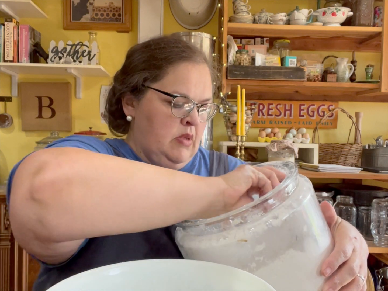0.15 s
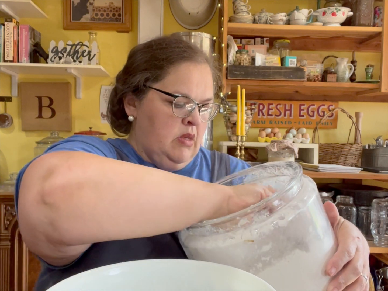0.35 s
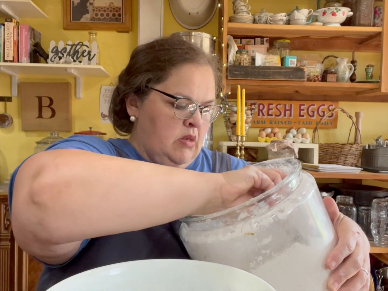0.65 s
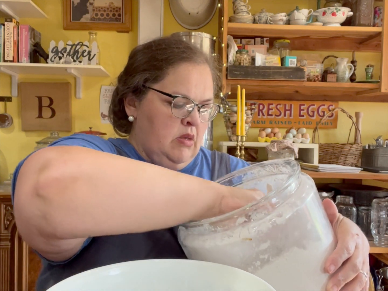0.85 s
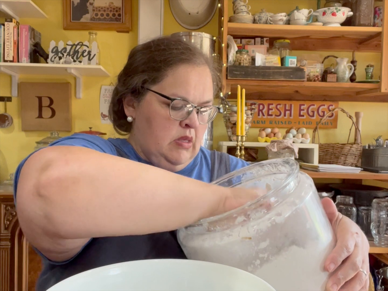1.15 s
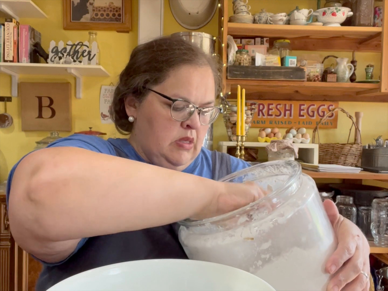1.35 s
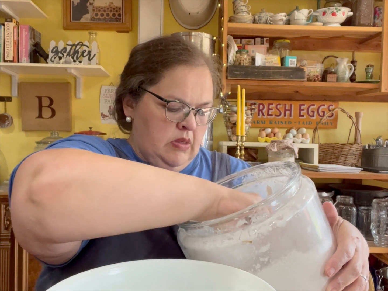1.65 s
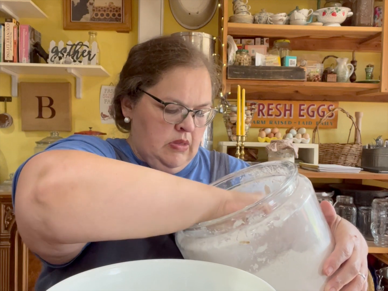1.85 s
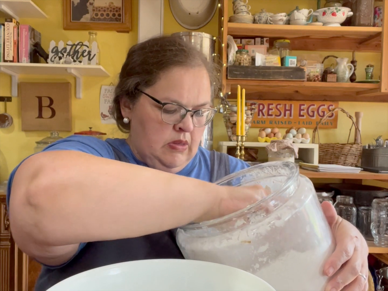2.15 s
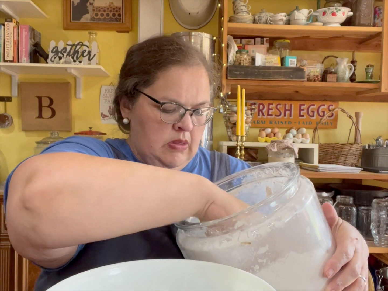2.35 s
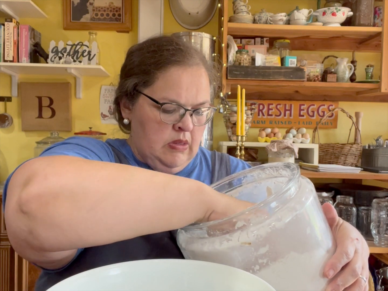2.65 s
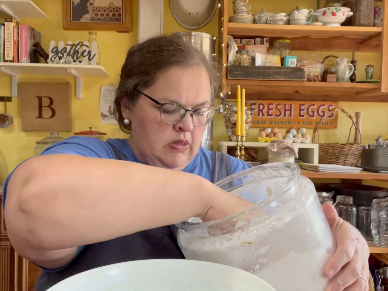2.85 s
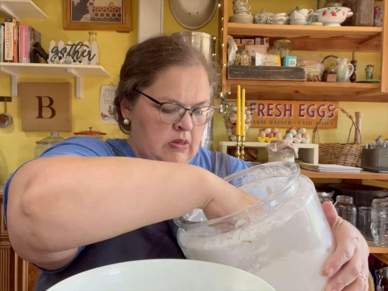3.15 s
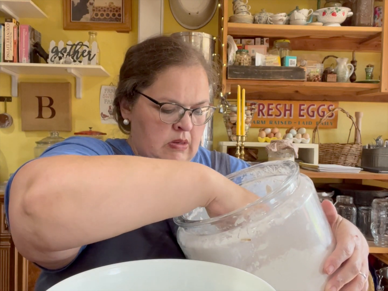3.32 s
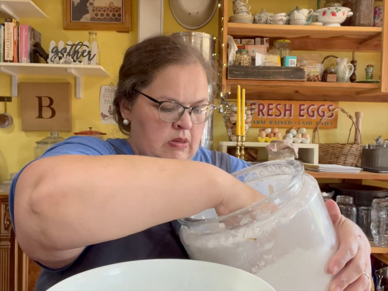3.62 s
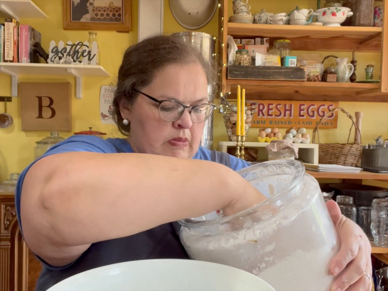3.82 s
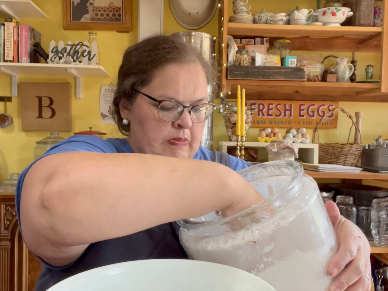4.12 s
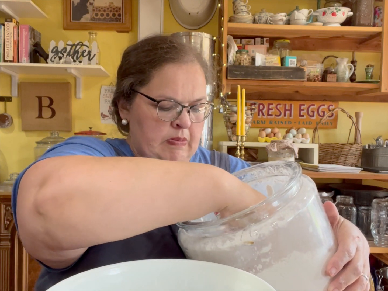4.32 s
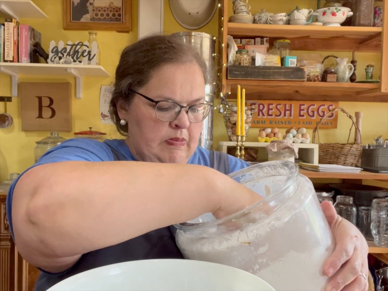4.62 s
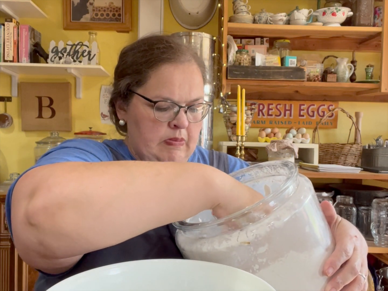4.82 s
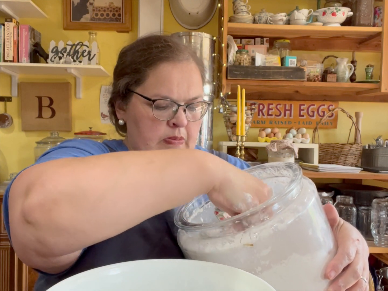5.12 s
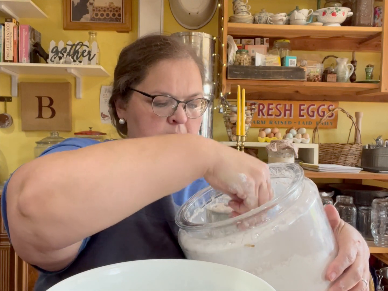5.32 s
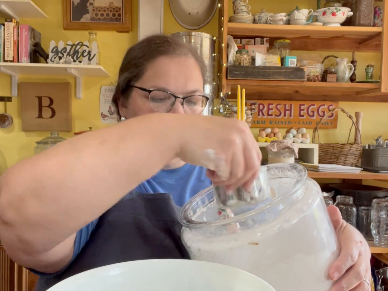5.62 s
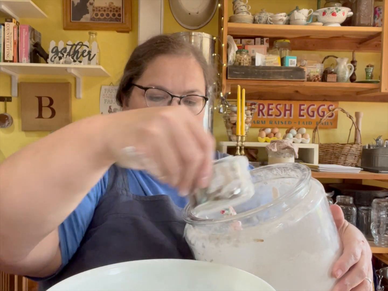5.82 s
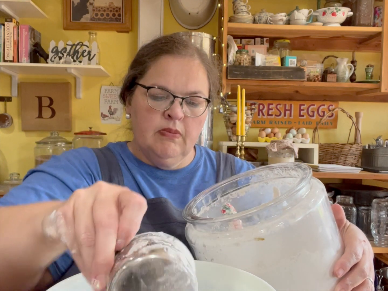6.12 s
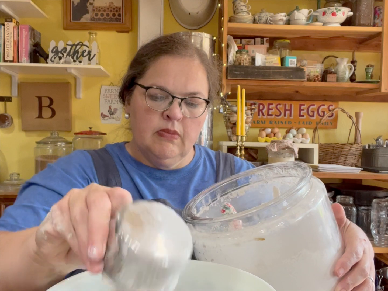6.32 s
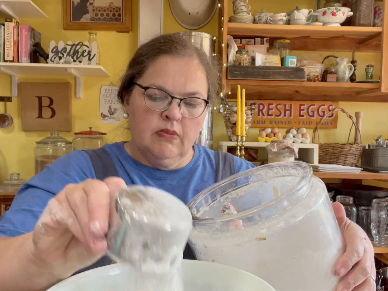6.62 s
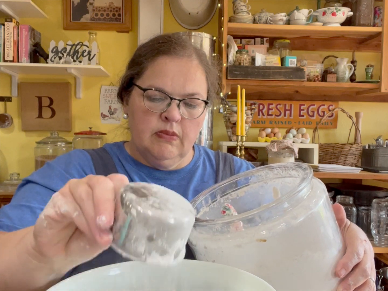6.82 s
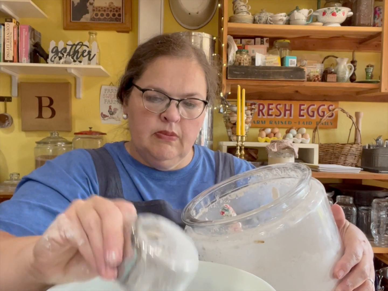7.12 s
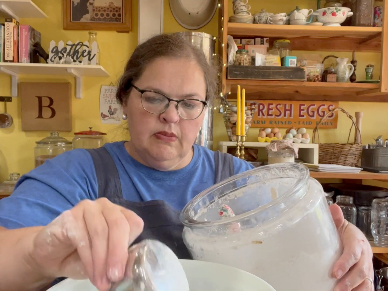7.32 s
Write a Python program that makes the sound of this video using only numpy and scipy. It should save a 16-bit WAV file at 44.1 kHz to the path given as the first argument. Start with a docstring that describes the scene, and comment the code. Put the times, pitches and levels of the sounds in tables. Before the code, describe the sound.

In a small quiet kitchen with a steady fridge hum, a close stereo microphone hears a small cup knocking in a big glass jar of flour to the right. Muted knocks crowd the first two seconds, the loudest a bright ringing clink near one second. Then come long near-silences, a dry crack, two dull bumps, soft drags, grainy slides of flour and a faint final thump.

```python
"""A quiet kitchen, with a two-port microphone close to a big glass jar of flour that stands to its right.
From the start a fridge hums (beating sines, coloured noise) and flour trickles (grainy high noise).
Soon a small cup knocks on the jar wall (clicks, air thumps, decaying modes of glass and cup), each blow
with a worktop echo and a noise tail of the room. Short slides of flour come between, lower noise rasps as
the cup drags, bright cracks come with some knocks and slides or alone; late on, flour lands with a thump."""
import sys
import numpy as np
from scipy import signal
from scipy.fft import rfft, irfft, next_fast_len
from scipy.io import wavfile

SR = 44100
rng = np.random.default_rng(int(sys.argv[2]) if len(sys.argv) > 2 else 0)


def materialize(psi):
    """Save the field psi as 16-bit PCM at rate SR to the path in sys.argv[1].

    A 1-D psi becomes a single channel; in a 2-D psi each row is a channel.
    """
    bounded = np.clip(np.atleast_2d(psi).T, -1, 1)
    quanta = np.round(bounded * 32767).astype(np.int16)
    wavfile.write(sys.argv[1], SR, quanta)


N = 329427

# Room tone behind the jar. Each row: frequency in Hz, relative density in dB per Hz.
ROOM_TONE_COLOUR = [(20, -44), (33, -17.5), (48, -10), (66, -0.5), (88, -5), (157, -3.5), (220, -6.5),
                    (330, -7.5), (480, -13.5), (800, -15.5), (2200, -26.5), (4500, -37.5), (8500, -45),
                    (11000, -58.5), (16000, -61)]
# Chosen stereo spread of the noise, wide in the treble. Each row: frequency in Hz, shared power from 0 to 1,
# radians by which the right leads, left minus right in dB.
STEREO_SPREAD = [(39.7, 1, 0.5, 2), (154, 1, 0.5, 0), (215, 0.7, 0, 1.5), (347, 1, 1.22, -1),
                 (461, 0.02, 1.5, 1.5), (764, 0.5, 2, -2), (950, 0.3, 2.5, 0), (1200, 0.8, 1.5, -0.5),
                 (2260, 0, 4.5, 2), (4900, 0.05, 3.5, -2), (6600, 0, 3, 1.5), (8720, 0.9, 4.5, 2),
                 (9100, .999, 3.14, 0), (12600, .999, 3.14, 0), (13900, 0.5, 2, -3), (15400, 0.5, 3, 2.5)]
# Spectrum of sifting flour. Each row: frequency in Hz, relative density in dB per Hz.
SIFT_COLOUR = [(2000, -29), (4000, -6.5), (6500, -5.5), (8300, -2), (10000, -1.5), (12500, -10),
               (16000, -6)]
# Trickle of flour that swells and thins under the slides. Each row: time in seconds, level in dB.
TRICKLE = [(0, -79.5), (.4, -73.5), (.75, -87), (1.15, -67), (1.45, -74.5), (2.2, -78), (3.1, -84.5),
           (7.47, -87.5)]
# Knocks of cup on jar, and soft dull thumps, the last like flour landing in a bowl.
# Each row: start in seconds, click in dB, contact sharpness in Hz, air thump in Hz,
# thump in dB, jar ring in dB, cup ring in dB, tick in dB.
BLOWS = [(0.1297, -26, 2040, 440, -21.5, -35.5, -59, -42), (0.63, -40, 990, 470, -21, -32.5, -69, -56.5),
         (0.879, -58, 3600, 400, -58, -65, -71, -53), (.8845, -54, 3400, 400, -59, -64, -70, -49),
         (1.042, -7.5, 2600, 470, -18, -24, -20.5, -56), (1.272, -31, 8500, 402, -21.5, -58, -74, -36),
         (1.6434, -33, 4700, 407, -20, -51, -72, -41.5), (1.795, -25.5, 1540, 483, -28, -34, -70, -52),
         (1.978, -61, 710, 390, -25, -68, -77, -60), (4.122, -39, 600, 335, -25.5, -75, -82, -58),
         (4.219, -45, 600, 348, -27, -64, -82, -64), (6.611, -58, 650, 585, -27.5, -70, -90, -53)]
# Dry tick of a hard edge on glass. Each mode: frequency in Hz, relative level in dB, t60 in seconds.
TICK_MODES = np.transpose([ [910, 1420, 2150, 2907, 3500, 4230, 4900, 5900, 7600, 8700],
              [11, 7, 3, 4, 11, 13, 0, -11, -15, -21],
              [.010, .009, .006, .007, .008, .007, .005, .005, .004, .004]])
# Dead slap of the wall under the cup. Each row: frequency in Hz, relative level in dB, t60 in seconds.
SLAP_MODES = [(1010, 7.5, 0.005), (1445, 3, 0.03), (1874, 7.5, 0.012), (2317, 3, 0.05)]
# Jar wall. Each mode: frequency in Hz, relative level in dB, t60 in seconds, left minus right in dB,
# radians by which the right leads.
JAR_MODES = np.transpose([ [570, 772, 802, 829, 845, 884, 1060, 1163, 1250, 1268, 1365, 1481, 1775, 1891, 2294],
             [-22, -2, 0.5, 0.43, -7.5, -7, -10.5, -16, -10, -4, -3, -14, -12, -16, -8],
             [0.2, 0.26, 0.22, 0.21, 0.34, 0.226, 0.08, 0.2, 0.3, 0.28, 0.2, 0.25, 0.2, 0.2, 0.11],
             [-3.0, 0.0, -9.5, 2.2, -10.5, 1.5, -1.0, 1, -6.5, 0.0, 3.5, -3.0, -5, 1, 5.5],
             [-0.16, 2.2, 2.5, 0.19, 1.5, -1.5, -0.5, 5.5, 1.5, -2.5, 3.7, 2.0, 1.5, 0.5, -2.0]])
# Cup ringing free, in close pairs that beat. Each mode: frequency in Hz, relative level in dB,
# t60 in seconds, left minus right in dB, radians by which the right leads.
CUP_MODES = np.transpose([ [2371, 2413, 2422, 2432, 2858, 2877, 3345, 3387, 4585, 4615, 5010, 6086, 6103, 6440, 7733, 8095, 8143, 8450],
             [-20, -15, -2.5, -16, -21.5, -14.5, -34, -34.5, -29, -31.5, -32, -28.5, -33, -33.5, -44, -41, -36, -36],
             [0.1, 0.55, 0.18, 0.2, 0.33, 0.15, 0.3, 0.33, 0.42, 0.36, 0.19, 0.18, 0.25, 0.33, 0.25, 0.25, 0.2, 0.17],
             [2.0, -1.0, 2.0, -1.0, 1, 3.5, 1.0, -3.0, -2.5, 2.5, 2.0, -9, 8.5, 2, 4, -4, 5, 3.5],
             [12.0, -2.5, 1.36, 5.8, 2.0, -5.0, 0.6, -2, 1.6, 0.5, 3.5, 0.0, 4.0, 4.0, -4.0, -8.5, -2.0, -2.6]])
# Kitchen echoes. Each row: frequency in Hz, t60 in seconds.
KITCHEN_DECAY = [(300, 0.033), (1000, 0.43), (4000, 0.37), (12000, 0.11)]
# Fine flour slipping over itself. Each row: start of hold in seconds, hold in seconds, level in dB.
SLIDES = [(0.488, 0.028, -75), (.585, 0.055, -68.5), (0.872, 0.05, -68), (1.646, 0.021, -72),
          (1.837, 0.045, -73), (2.025, .03, -76), (2.177, 0.029, -75), (2.857, 0.052, -73.5),
          (5.209, 0.029, -75), (5.867, 0.087, -59), (6.038, 0.094, -73), (6.237, 0.033, -63),
          (6.297, 0.015, -54), (6.47, 0.071, -74), (7.21, .03, -75), (7.291, 0.025, -75), (7.41, .03, -75)]
# Bright cracks of flour crusts and hard contacts. Each row: start in seconds, level at the start in dB.
CRACKS = [(0.8782, -62.5), (1.043, -38), (1.271, -42), (1.6428, -55), (2.7213, -48.5), (5.8554, -59),
          (6.2347, -62), (6.302, -44)]
# Cup dragged through the flour. Each row: middle in seconds, length in seconds, level in dB.
DRAGS = [(0.899, 0.027, -54), (3.602, 0.074, -62.5), (4.34, 0.094, -63), (4.977, 0.22, -67),
         (5.499, 0.092, -64), (6.307, 0.042, -59), (6.508, 0.05, -55), (7.048, 0.053, -67)]
# Spectrum of the drags. Each row: frequency in Hz, relative density in dB per Hz.
DRAG_COLOUR = [(400, -35), (1000, -2.5), (1500, -1.5), (1950, 1.5), (2600, -6.5), (7000, -29.5)]

HUM_HZ, HUM_DB = 268.68, (-37.5, -43)   # rms level: left, right
# two motors turn at almost the same speed, so their tone swells and fades; rms levels
MOTOR_HZ, MOTOR_DB, SECOND_MOTOR_DB = 59.2, -52.5, -58
BEAT_PERIOD_S, BEAT_LOUDEST_S = 4.56, 2.78
ROOM_TONE_DB = -46
SLIDE_RISE_DB_PER_S, SLIDE_FALL_DB_PER_S, CRACK_T60_S = 700.5, 300.5, 0.019
THUMP_T60_S = 0.018
REBOUND_S, REBOUND_DB = 0.000914, -4.5   # a hard edge touches a second time at once; delay varies per blow
RING_LAG_S, RING_RISE_S = 0.002036, 0.0036   # the glass takes a moment to ring up
JAR_LAG_S = .00009   # the jar stands to the right: the left port hears the blows later
COUNTER_LAG_S, COUNTER_DB = (0.0056, .0055), -6   # one strong echo off the worktop: left, right
KITCHEN_DB, RING_ROOM_DB = -6.5, -8.5   # echo level; share of the rings sent into the kitchen
CUTOFF_HZ = 15800


def from_db(db):
    """Decibels to gain."""
    return 10 ** (np.asarray(db) / 20)


def rms_one(x):
    """Scale to rms 1."""
    return x / np.sqrt(np.mean(x ** 2))


def in_time(rows):
    """A (seconds, value) curve at every sample."""
    return np.interp(np.arange(N) / SR, *np.transpose(rows))


def at_hz(rows, hz):
    """Every column of a table, read on a log-frequency axis."""
    key, *columns = np.transpose(rows)
    return [np.interp(np.log(hz), np.log(key), c) for c in columns]


def drift(rate):
    """Slow chance at about rate changes a second, spread 1: noise through a double low-pass pole."""
    r = np.exp(-2 * np.pi * rate / SR)
    wander = signal.lfilter([1], [1, -2 * r, r * r], rng.standard_normal(N + SR))
    return rms_one(wander[SR:])


def stereo_noise(colour):
    """Coloured noise, left and right: a shared part with a phase lead and a part of each side's own; rms 1."""
    size = next_fast_len(N)
    hz = np.maximum(np.fft.rfftfreq(size, 1 / SR), 1)
    shared, lead, balance_db = at_hz(STEREO_SPREAD, hz)
    shared = np.clip(shared, 0, 1)
    tilt = from_db(balance_db / 2)
    common, left, right = rfft(rng.standard_normal((3, size)))
    common, own = np.sqrt(shared) * common, np.sqrt(1 - shared)
    left = (common + own * left) * tilt
    right = (common * np.exp(1j * lead) + own * right) / tilt
    spectrum = np.array([left, right]) * from_db(at_hz(colour, hz)[0])
    return rms_one(irfft(spectrum, size)[:, :N])


def fridge():
    """A steady hum and a beating low motor tone, over the rumble and hiss of the room."""
    t = np.arange(N) / SR
    side_phase = np.array([[0], [.17]])   # radians: left, right
    hum = from_db(0.91 * drift(5.9)) * np.sin(2 * np.pi * HUM_HZ * t + side_phase)
    turn = 2 * np.pi * MOTOR_HZ * t + 0.29 * drift(1.0)
    beat = 2 * np.pi * (t - BEAT_LOUDEST_S) / BEAT_PERIOD_S
    slower = from_db(MOTOR_DB) * np.sin(turn - beat / 2)
    faster = from_db(SECOND_MOTOR_DB) * np.sin(turn + beat / 2)
    motor = (slower + faster) * from_db([[1.2], [-1.2]])   # a little stronger on the left
    tones = from_db(HUM_DB)[:, None] * hum + motor
    room_tone = from_db(ROOM_TONE_DB + .5 * drift(1.9)) * stereo_noise(ROOM_TONE_COLOUR)
    return np.sqrt(2) * tones + room_tone   # root 2 takes a sine from rms to peak


def slide(t, s, hold, db):
    """Grains let go, slip for a while and settle: level rises to a hold and falls, straight in dB."""
    rise_db = SLIDE_RISE_DB_PER_S * np.maximum(s - t, 0)
    fall_db = SLIDE_FALL_DB_PER_S * np.maximum(t - s - hold, 0)
    return from_db(db - rise_db - fall_db)


def flour():
    """Fine grains hiss high and grainy, crusts and hard contacts crack; drags of the cup rasp lower."""
    t = np.arange(N) / SR
    # a drag is 2.3 dB down at either end of its length
    strokes = sum(from_db(db - 2.3 * ((t - s) / length * 2) ** 2) for s, length, db in DRAGS)
    cracks = sum(from_db(db - 60 * np.abs(t - s) / CRACK_T60_S) * (t >= s) for s, db in CRACKS)
    slides = sum(slide(t, *row) for row in SLIDES)
    grainy = (from_db(in_time(TRICKLE)) + slides) * from_db(1.1 * drift(60))
    sifting = (grainy + cracks) * stereo_noise(SIFT_COLOUR)
    return sifting + strokes * from_db(2.0 * drift(74)) * stereo_noise(DRAG_COLOUR)


def modes(table, t):
    """Decaying sines from one blow, each struck a little differently."""
    hz, level_db, t60 = np.transpose(table)[:, :, None]
    level_db = level_db + rng.standard_normal(hz.shape)
    return np.sum(from_db(level_db - 60 * t / t60) * np.sin(2 * np.pi * hz * t), axis=0)


def rings(table, t, neighbour_sign):
    """Modes of jar or cup at both ports; each radiates towards its own side."""
    hz, level_db, t60, balance_db, lead = np.transpose(table)[:, :, None]
    since = np.maximum(t - RING_LAG_S, 0)
    level_db = level_db + rng.standard_normal(hz.shape)
    gain = from_db(level_db - 60 * since / t60) * (1 - np.exp(-since / RING_RISE_S))
    gain = gain * neighbour_sign ** np.arange(len(hz))[:, None]   # a negative factor alternates the signs
    turn, tilt = 2 * np.pi * hz * since, from_db(balance_db / 2)
    left = np.sum(gain * tilt * np.sin(turn), axis=0)
    right = np.sum(gain / tilt * np.sin(turn + lead), axis=0)
    return np.array([left, right])


def tick_of_edge(t):
    """A hard edge excites short glass modes, then touches again after a slightly random gap."""
    touch = modes(TICK_MODES * [rng.normal(1, 0.013), 1, 1], t)   # no two edges sound quite alike
    gap = REBOUND_S * rng.uniform(0.84, 1.24)
    return touch + from_db(REBOUND_DB) * np.interp(t - gap, t, touch, left=0)


def knocks_and_thumps():
    """Each blow mixes a click, air thump, slap, tick and two rings; rows: blow, rings left, rings right."""
    out, t = np.zeros((3, N + SR)), np.arange(SR // 2) / SR
    for s, click_db, contact_hz, thump_hz, thump_db, jar_db, cup_db, tick_db in BLOWS:
        tick = from_db(tick_db) * tick_of_edge(t)
        thump = from_db(thump_db) * modes([(thump_hz, 0, THUMP_T60_S)], t)
        blow = thump + tick + from_db(jar_db) * modes(SLAP_MODES, t)
        blow[0] += from_db(click_db) * SR / contact_hz / 2   # a softer contact spreads the same peak wider
        contact = signal.butter(2, min(contact_hz, 18000), fs=SR, output="sos")
        struck = np.vstack([blow, from_db(jar_db) * rings(JAR_MODES, t, 1.0)])
        sound = signal.sosfilt(np.vstack([contact, contact]), struck)
        sound[1:] += from_db(cup_db) * rings(CUP_MODES, t, -1.013)
        out[:, round(s * SR):][:, :len(t)] += sound
    # bending waves in the glass carry the highs faster: the click arrives as a falling chirp
    pole = np.exp(-2 * np.pi * 600 / SR)
    chirp = np.tile([-pole, 1, 0, 1, -pole, 0], (10, 1))   # ten all-pass stages
    chirped = signal.sosfilt(chirp, out[:, :N] + 1e-18)
    return signal.sosfilt(signal.butter(2, 280, "high", fs=SR, output="sos"), chirped)


def worktop(hits):
    """One reflection reaches each port at its own delay; a small top reflects few lows."""
    n = np.arange(N)
    bounce = signal.lfilter(*signal.butter(2, 1100, "high", fs=SR), hits)
    return np.array([np.interp(n - lag * SR, n, bounce) for lag in COUNTER_LAG_S])


def kitchen(x):
    """Dense echoes: octave bands of noise, each dying at its own rate, other noise for each port."""
    t = np.arange(SR // 2) / SR
    tail, swell = 0, 1 - np.exp(-t / 0.00091)   # the echoes build up over a few ms
    for low in 150 * 2. ** np.arange(7):
        band = signal.butter(2, [low, 2 * low], "band", fs=SR, output="sos")
        t60 = at_hz(KITCHEN_DECAY, low * np.sqrt(2))[0]
        noise = signal.sosfilt(band, rng.standard_normal((2, len(t))))
        tail = tail + noise * from_db(-60 * t / t60)
    tail = tail * swell
    tail = tail / np.sqrt(np.sum(tail ** 2) / 2)   # mean energy 1 per port
    return signal.fftconvolve(x[None], tail, axes=1)[:, :N]


def scene():
    """Blows reach the right port first, bounce off the worktop and fill the kitchen; flour and fridge lie under."""
    (hits, *ringing), n = knocks_and_thumps(), np.arange(N)
    late_hits = np.interp(n - JAR_LAG_S * SR, n, hits)
    direct = np.array([late_hits, hits]) + ringing
    room = kitchen(hits + from_db(RING_ROOM_DB) * ringing[1])   # the right port's rings feed the room
    struck = direct + from_db(COUNTER_DB) * worktop(hits) + from_db(KITCHEN_DB) * room
    return struck + flour() + fridge()


def record(dry):
    """The top is cut steeply by an elliptic low-pass."""
    return signal.sosfilt(signal.ellip(10, .5, 70, CUTOFF_HZ, fs=SR, output="sos"), dry)


dry = scene()
out = record(dry)
materialize(out)
```